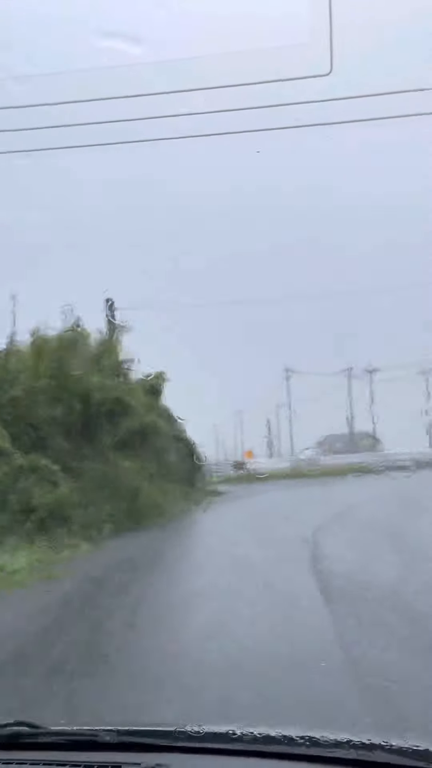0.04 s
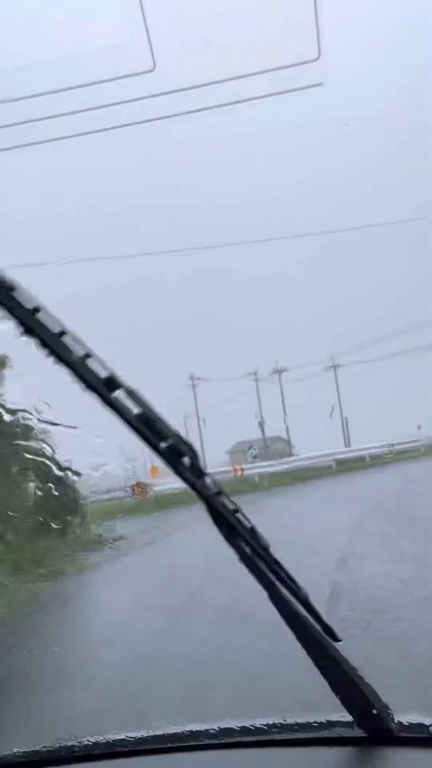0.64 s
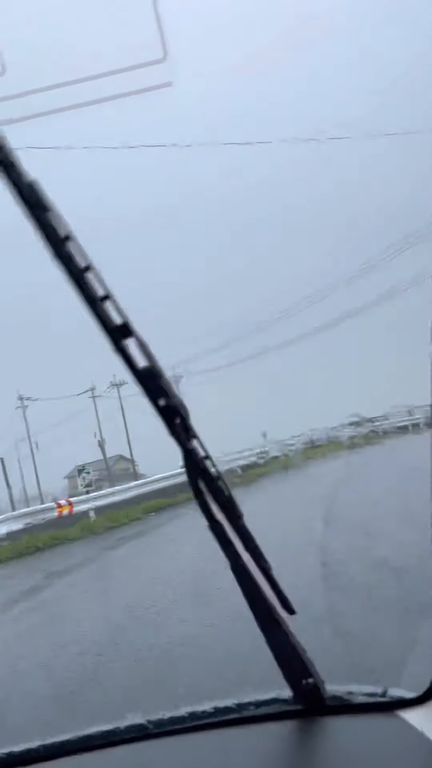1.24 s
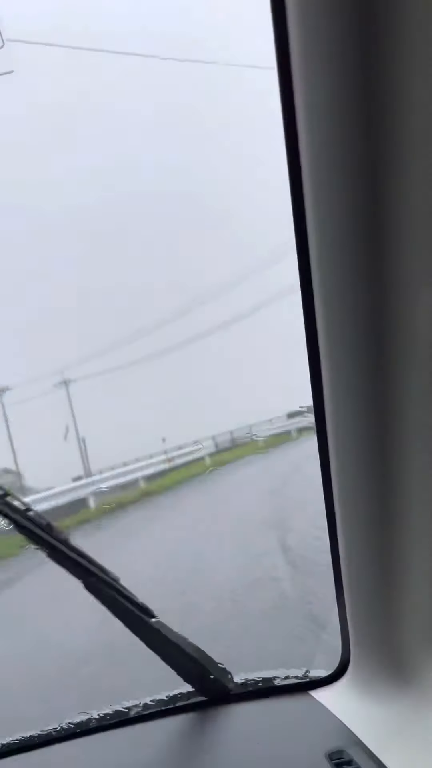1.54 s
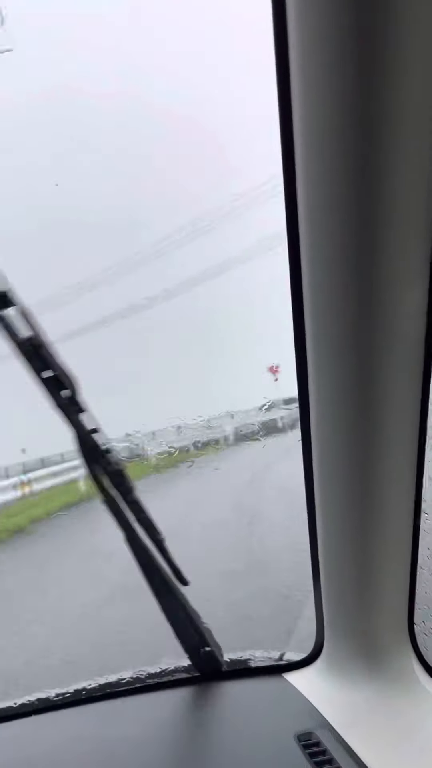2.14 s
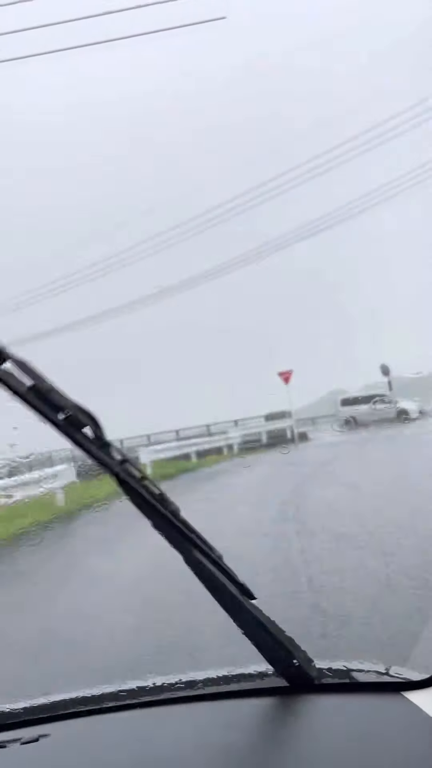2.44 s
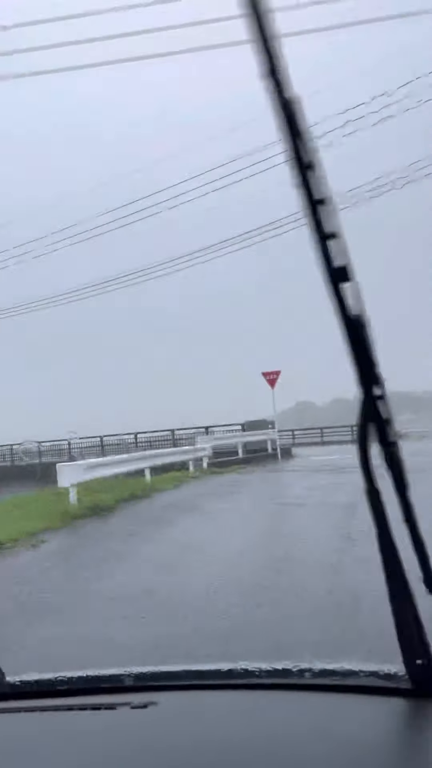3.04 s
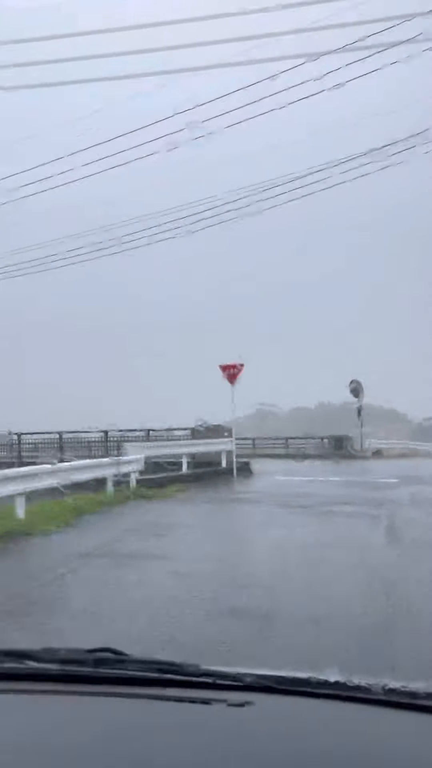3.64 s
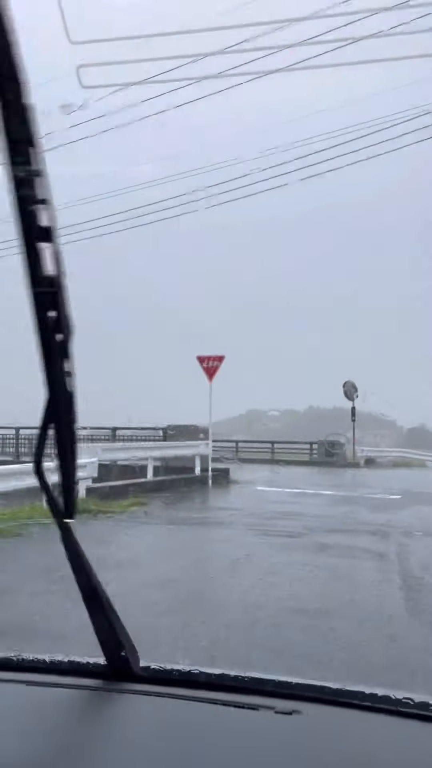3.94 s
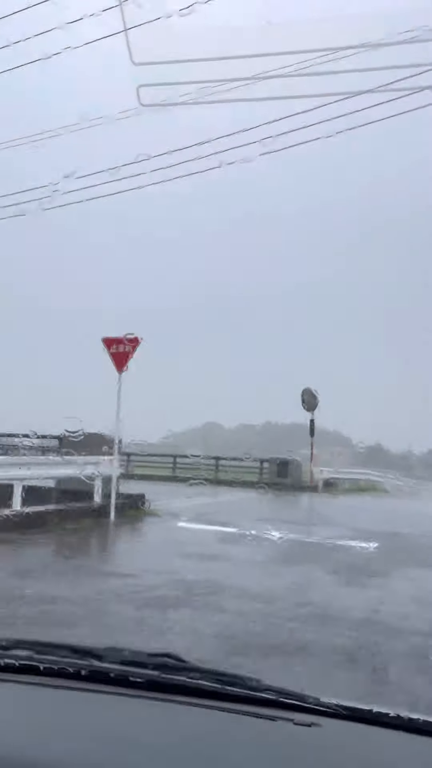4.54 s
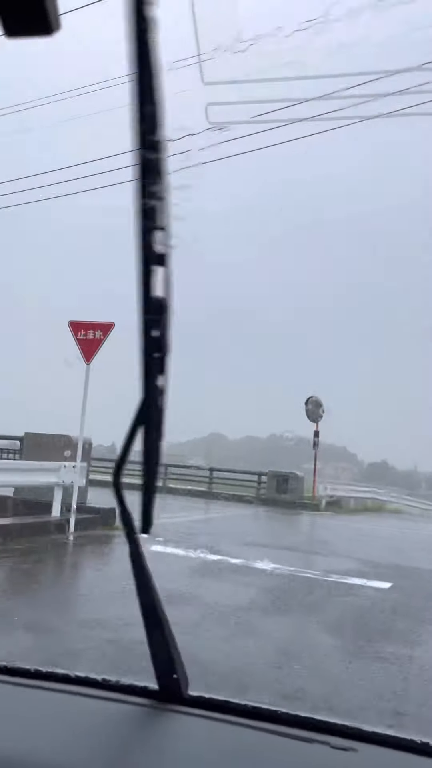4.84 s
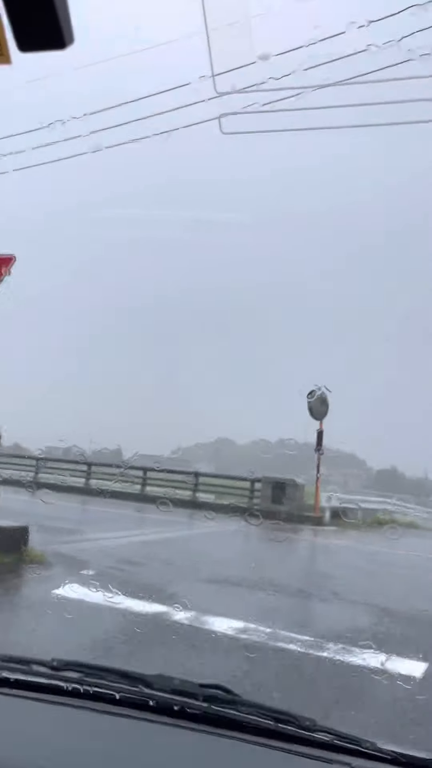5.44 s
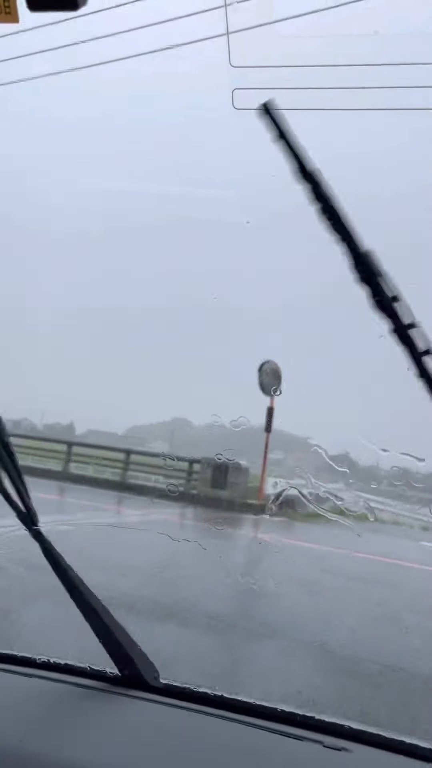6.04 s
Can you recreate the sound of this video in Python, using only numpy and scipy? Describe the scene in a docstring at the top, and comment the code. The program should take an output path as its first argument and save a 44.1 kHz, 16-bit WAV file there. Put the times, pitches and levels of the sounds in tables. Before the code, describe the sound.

Rain drums on a moving car, heard from inside over low road rumble, with steadily thumping wipers and fading tyre spray.

```python
"""Road rumble fills a car that slows for a junction in heavy rain, heard at two close microphone ports.
The tyres force the body into vibration, and the cabin air booms. Wiper impacts excite the modes of the
windshield at both ends of each sweep; between them the blades swish through the water. Drops drum on the
roof and ring on the glass, spray hisses less as the speed falls, and a few sharp ticks sound nearby."""
import sys
import numpy as np
from scipy import signal
from scipy.fft import rfft, irfft, next_fast_len
from scipy.io import wavfile
from scipy.ndimage import uniform_filter1d, map_coordinates

SR = 44100
rng = np.random.default_rng(int(sys.argv[2]) if len(sys.argv) > 2 else 0)


def unload_wav(signal):
    """Save mono or channel-first audio to the path in sys.argv[1] as 16-bit WAV at rate SR, clipped to [-1, 1]."""
    wavfile.write(
        sys.argv[1],
        SR,
        np.round(np.clip(np.atleast_2d(signal).T, -1, 1) * 32767).astype(np.int16),
    )


N = 276948
TIME = np.arange(N) / SR
BAND_LIMIT_HZ = 15800

# Spectra of the body rumble and the cabin boom: f/Hz, relative density/dB
RUMBLE_SPECTRUM = [(12, -52), (22, -19), (32, 4), (41, -13), (50, 5.5), (72, 3.5), (88, 3), (100, -1.5),
                   (116, -5), (135, -6.5), (250, -61)]
BOOM_SPECTRUM = [(95, -8), (128, 2), (163, 0), (181, -14.5), (198, -9), (222, -11), (290, -13), (350, -15),
                 (480, -24), (700, -51)]
# Rougher and smoother stretches of road: middle t/s, duration/s, level change/dB
ROAD_SURFACE = [(1.8, 1, 1.5), (5.344, 0.41, 2), (5.76, 0.26, -4.5)]


def road():
    """Structure-borne sound: tyres shake the body and cabin air; the boom dies away as the car slows."""
    surface_db = sum(db * np.exp(-(2 * (TIME - s) / length) ** 2) for s, length, db in ROAD_SURFACE)
    rumble = amp(-17.5 + 0.013 * slowing_db()) * drone(RUMBLE_SPECTRUM, evenness=.7, span_s=.14)
    boom = amp(-20.5 + 0.82 * slowing_db()) * drone(BOOM_SPECTRUM, evenness=.6, span_s=.2)
    return amp(surface_db) * (rumble + boom + hum())


# Low cabin tones: f/Hz, base level/dB, fall per dB of slowing/dB
CABIN_TONES = [(70.35, -26.5, 0.44), (100.7, -27, 0.2), (134.1, -27.5, 1.5), (163.5, -24.5, 1.4),
               (192.7, -33.5, 0.37)]


def hum():
    """Forced vibration: engine and road sustain low, wavering tones, alike at both ports."""
    track = np.zeros(N)
    for hz, db, follows in CABIN_TONES:
        level_db = db + follows * slowing_db() + wobble(6)
        pitch = hz * (1 + 0.0195 * wobble(7))
        track += amp(level_db) * np.sqrt(2) * tone(pitch)
    return track


SWEEP_S, FAR_TURN_S, FOOT_TURN_S = .8968, .481, .026  # wiper period; first turn at each end
# Modes of the windshield with its linkage, and of the rubber lip: f/Hz, relative level/dB, T60/s
GLASS_MODES = [(146, -8.5, 0.28), (202.8, -9.5, 0.4), (229.6, 4, 0.071), (295.6, -0.5, 0.11),
               (353, -3.5, 0.058), (402, -7.5, 0.068), (470, -16.5, 0.068), (530, -14.5, 0.095)]
LIP_MODES = [(850, 8.5, 0.094), (886, 10, 0.053), (986, 9, 0.053), (1764, 5, 0.03)]
# Friction of rubber on wet glass: f/Hz, relative density/dB
RUB_SPECTRUM = [(120, -10), (200, 5), (260, 2.5), (340, 4), (450, -6.5), (620, -12), (900, -17),
                (1100, -21), (2000, -35), (6000, -90)]
# Reversals at the far end of the sweep: t/s, thump gain/dB, lip gain/dB, drag level/dB
REVERSALS = [(0.4812, -11, -28, -34), (1.3785, -10.5, -29, -34), (2.2771, -10, -28.5, -20),
             (3.1706, -9.5, -34.5, -33), (4.0652, -9.5, -31, -27.5), (4.962, -11.5, -29, -28),
             (5.8621, -11, -30, -28.5)]


def wipers(foot_db=-13.5, cushion_s=.0033, lip_lead_s=.0078):
    """Impact and friction: at each reversal the lip snaps over, the arm knocks and the rubber rubs."""
    def knock():
        return blow(GLASS_MODES, scatter_db=.7, attack_s=cushion_s)

    def rub_off(s):
        return np.clip((TIME - s) / cushion_s, 0, 1) ** 2 * np.exp(-np.abs(TIME - s) / .078)

    knocks, rubbing = np.zeros((2, N))
    for s, thump_db, lip_db, drag_db in REVERSALS:
        add(knocks, s - lip_lead_s, amp(lip_db) * blow(LIP_MODES, scatter_db=1.5, attack_s=.004))
        add(knocks, s, amp(thump_db) * knock())
        # the second blade follows, more softly
        add(knocks, s + .0147, amp(thump_db - 3) * knock())
        add(knocks, s + .047, amp(lip_db - 11) * blow(LIP_MODES, scatter_db=2, attack_s=.003))
        drag = np.exp(-((TIME - s + .051) / .028) ** 2)  # swells just before the turn
        rubbing += amp(drag_db) * drag + amp(thump_db - 13) * rub_off(s)
    for s in np.arange(FOOT_TURN_S, N / SR, SWEEP_S):  # softer turns at the foot of the glass
        add(knocks, s - lip_lead_s, amp(foot_db - 35) * blow(LIP_MODES, scatter_db=6, attack_s=.0027))
        add(knocks, s, amp(foot_db) * knock())
        rubbing += amp(foot_db - 15.5) * rub_off(s)
    track = rubbing * unit(coloured(noise(), RUB_SPECTRUM))
    track[0] += knocks  # row 0 becomes the part that both ports share
    return track


def blow(modes, scatter_db, attack_s):
    """Modal superposition: a cushioned impact starts damped sinusoids, slightly different each time."""
    t = np.arange(SR // 3) / SR
    hz, db, t60 = np.transpose(modes)[:, :, None]
    strength = amp(db + scatter_db * rng.standard_normal(hz.shape))
    pitch = hz * (1 + 0.0094 * rng.standard_normal(hz.shape))
    ring = strength * amp(-60 * t / t60) * np.sin(2 * np.pi * pitch * t)
    return ring.sum(0) * (1 - np.exp(-2 * t / attack_s)) ** 2


# Water hiss, falling with the car's speed: t/s, relative level/dB
HISS_LEVELS = [(0.0, -32.5), (0.68, -33.5), (1.36, -35), (3.69, -38), (6.19, -48.5), (6.28, -49.5)]
# Fine spray: f/Hz, relative density/dB
HISS_SPECTRUM = [(200, -15), (420, 10), (600, 10), (730, 13), (1000, 3), (1800, 1), (3200, 3.5),
                 (4200, 3.5), (5200, 1.7), (7200, 0), (11100, 0.5), (11900, -5), (13000, -20.5),
                 (14200, -95)]


def spray(gain_db=3.5, flutter_db=0.85):
    """Incoherent summation: droplets on glass and tyres merge into a hiss, with a few standing out."""
    water = noise() + amp(-4.5) * drops(per_s=3000, spread_db=6.5)
    level_db = curve(HISS_LEVELS) + gain_db + flutter_db * wobble(24.38)
    return amp(level_db) * unit(coloured(water, HISS_SPECTRUM))


def slowing_db():
    """Hiss falls with speed, so its change since the start (negative) stands for the speed lost."""
    hiss_db = curve(HISS_LEVELS)
    return hiss_db - hiss_db[0]


# Rain heard through the lined roof: f/Hz, relative density/dB
ROOF_SPECTRUM = [(120, -7), (250, 3), (400, -1), (550, -2.3), (595, -2.5), (655, -1.5), (740, -3),
                 (820, -1), (960, -3.5), (1270, -4), (1380, -7.5), (1490, -9), (1580, -5.5), (1660, -9),
                 (1770, -9), (2170, -14.5), (2350, -12.5), (2560, -12), (2850, -18), (3030, -18.5),
                 (3300, -24.5), (9000, -84)]


def roof_rain():
    """Random impact excitation: dense drops drum on the roof panel, whose lining damps the treble."""
    patter = drops(per_s=2000, spread_db=2) + amp(1) * noise()
    patter = cabin_reflections(patter, wet_db=-12, t60=.08)
    level_db = -31.5 + 0.037 * slowing_db() + 1.3 * wobble(8.2)
    return amp(level_db) * unit(ports(coloured(patter, ROOF_SPECTRUM)))


def cabin_reflections(x, wet_db, t60):
    """Reverberation: glass and trim return a short, exponentially decaying tail of reflections."""
    t = np.arange(SR // 12) / SR
    tail = noise(len(t)) * amp(-60 * t / t60) * (t > .002)
    tail /= np.linalg.norm(tail[0])
    return x + amp(wet_db) * signal.fftconvolve(x, tail, axes=1)[:, :N]


CLUMP_DB, CLUMPS_PER_S = 1.4, 22  # water reaches the glass in uneven clumps
# Sound of the water on the windshield: t/s, level/dB
WETNESS = [(0, -41), (0.55, -37), (1.2, -39), (2.0, -44), (2.55, -37.5), (3.25, -39.5), (3.7, -43),
           (4.05, -37), (4.35, -42.5), (4.7, -42.5), (5.4, -43.5), (6.28, -48)]
# Water pushed by the blades: f/Hz, relative density/dB
SWISH_SPECTRUM = [(700, -25), (1150, 3), (2000, 0.5), (3000, 0), (4200, -4.5), (7000, -42), (13500, -85)]


def swish(stroke_db=0.5):
    """Flow noise: the blades push water, louder on wetter glass and slightly louder in mid-stroke."""
    water = noise() + drops(per_s=900, spread_db=4)
    level_db = curve(WETNESS) + stroke_db * (stroke() - 0.5) + CLUMP_DB * wobble(CLUMPS_PER_S)
    return amp(level_db) * unit(coloured(water, SWISH_SPECTRUM))


def stroke():
    """Harmonic motion: the blades' squared speed, 0 at the turns and 1 in mid-stroke."""
    return np.sin(2 * np.pi * (TIME - FAR_TURN_S) / SWEEP_S) ** 2


def splats(count=1500, median_hz=1766, log_spread=0.335, attack_s=.0002, t60=0.031):
    """Damped free vibration: each big drop on the windshield rings briefly at its own pitch."""
    track, t = np.zeros((2, N)), np.arange(SR // 30) / SR
    envelope = amp(-60 * t / t60) * (1 - np.exp(-t / attack_s)) ** 2
    for (when, place), (pitch, size) in zip(rng.random((count, 2)), rng.standard_normal((count, 2))):
        hz = median_hz * np.exp(log_spread * pitch)
        ring = amp(3 * min(size, 1.5)) * envelope * np.sin(2 * np.pi * hz * t)
        direction = np.array([[np.cos(np.pi * place)], [np.sin(np.pi * place)]])
        add(track, when * N / SR, direction * ring)
    level_db = -42.5 + 0.47 * slowing_db() + CLUMP_DB * wobble(CLUMPS_PER_S)
    return amp(level_db) * unit(track)


# Hard contacts: t/s, pulse gain/dB, fizz re pulse/dB, fizz T60/s, lower f/Hz, upper f/Hz
CONTACTS = [(4.5103, -3, -14, .004, 3600, 12500), (4.823, -10, -21, .035, 8600, 14000),
            (5.7243, -22, -11, .007, 6500, 13000), (5.7468, -5.5, -16, 0.0061, 3200, 12100),
            (5.925, -27, -6, .05, 10100, 11800)]
# Colouring common to all ticks: f/Hz, gain/dB
TICK_RESPONSE = [(1000, -10), (4000, -3), (6200, 0), (9000, -4), (11300, 3), (13500, -13), (16000, -18)]


def ticks():
    """Impulse excitation: each tiny hard contact gives a pulse and a short fizz in its own band."""
    track, t = np.zeros((2, N)), np.arange(SR // 20) / SR
    for s, db, fizz_db, t60, low_hz, high_hz in CONTACTS:
        snap = amp(fizz_db) * noise(len(t)) * amp(-60 * t / t60)
        snap[:, 0] = 1  # the pulse
        band = signal.butter(2, [low_hz, high_hz], 'bandpass', fs=SR, output='sos')
        add(track, s, amp(db) * signal.sosfilt(band, snap))
    return coloured(track, TICK_RESPONSE)


# Water striking the wheel arches: f/Hz, relative density/dB
ARCH_SPECTRUM = [(220, -28), (270, -1), (320, 4.5), (380, -10), (460, -10.5), (620, -12), (900, -26)]


def puddle(middle_s=0.39, length_s=0.88, level_db=-35):
    """Noise-driven resonance: standing water thrown up by the tyres drums in the wheel arches."""
    crossing = np.exp(-(2 * (TIME - middle_s) / length_s) ** 4)
    return amp(level_db) * crossing * unit(coloured(noise(), ARCH_SPECTRUM))


def wiper_motor(whine_hz=828, sag=0.022, whine_db=-50):
    """Gear-mesh tone: a faint, unsteady whine whose pitch sags under the load in mid-stroke."""
    pitch = whine_hz * (1 - sag * stroke() + 0.01115 * wobble(40))
    return amp(whine_db + 1.5 * wobble(13)) * tone(pitch)


# Relation between the microphone ports: f/Hz, left phase lead/rad, coherence (0-1)
PORT_COHERENCE = [(100, -0.0, 0.9993), (300, -0.3, 0.96), (550, -0.9, 0.66), (850, -1.5, 0.58),
                  (1200, -1.6, 0.38), (1500, -0.4, 0.75), (1900, 0.1, 0.88), (2900, 0.5, 0.28),
                  (3900, 0.8, 0.61), (4500, 2.0, 0.54), (4900, 3.2, 0.93), (5300, 5.3, 0.71),
                  (5800, 6.2, 1.0), (6300, 6.6, 0.97), (7400, 7.9, 0.8), (8400, 9.0, 0.98),
                  (9000, 9.42, 1.0), (9500, 9.75, 1.0), (9900, 10.3, 0.93), (10900, 11.0, 0.91),
                  (11900, 12.55, 1.0)]


def ports(pair):
    """Partial coherence: a shared and an opposed signal mix into left and right, shifted in phase."""
    f, lead, coherence = np.transpose(PORT_COHERENCE)

    def weights(hz):
        angle = np.arccos(np.clip(np.interp(hz, f, coherence), 0, 1)) / 2
        return np.array([np.cos(angle), np.sin(angle)])

    shared, opposed = filtered(pair, weights)
    left_right = np.array([shared + opposed, shared - opposed])
    return filtered(left_right, lambda hz: np.exp(.5j * np.outer([1, -1], np.interp(hz, f, lead))))


def drone(spectrum, evenness, span_s):
    """Compression: coloured noise of rms 1 whose swells longer than span_s are partly evened out."""
    x = unit(ports(coloured(noise(), spectrum)))
    power = np.abs(uniform_filter1d(np.mean(x ** 2, 0), int(span_s * SR))) + 1e-6
    return unit(x / power ** (evenness / 2))


def drops(per_s, spread_db):
    """Shot noise: two independent showers of impulses with log-normal sizes; rms 1."""
    sizes = amp(spread_db * noise()) * rng.choice([-1, 1], (2, N))
    return unit(sizes * (rng.random((2, N)) < per_s / SR))


def noise(length=N):
    """Two independent white noises."""
    return rng.standard_normal((2, length))


def tone(hz):
    """A sinusoid whose phase is the integral of its frequency."""
    return np.sin(2 * np.pi * np.cumsum(hz) / SR)


def wobble(knots_per_s):
    """A smooth curve through random knots."""
    knots = rng.standard_normal(int(N * knots_per_s / SR) + 4)
    return map_coordinates(knots, [TIME * knots_per_s])


def curve(rows):
    """Linear interpolation of (time, value) rows at every sample."""
    return np.interp(TIME, *np.transpose(rows))


def filtered(x, response):
    """Linear filtering: the spectrum of x times a complex frequency response."""
    size = next_fast_len(N + SR // 2)
    return irfft(rfft(x, size) * response(np.fft.rfftfreq(size, 1 / SR)), size)[..., :N]


def coloured(x, points):
    """Spectral shaping by (f/Hz, gain/dB) points, with a roll-off beyond the last."""
    f, db = np.transpose(points)

    def response(hz):
        return amp(np.interp(np.log(hz + 1), np.log(f), db)) / (1 + (hz / (2 * f[-1])) ** 4)

    return filtered(x, response)


def add(track, s, sound):
    """Superpose a sound on a track at time s."""
    start = max(0, round(s * SR))
    part = sound[..., :max(0, N - start)]
    track[..., start:start + part.shape[-1]] += part


def amp(db):
    """Decibels to amplitude ratio."""
    return 10 ** (np.asarray(db) / 20)


def unit(x):
    """Scale to rms 1."""
    return x / np.sqrt(np.mean(x ** 2) + 1e-20)


def scene():
    """Superposition at the front seat; the roof is a little louder on the right."""
    front = splats() + spray() + swish() + wipers() + puddle()
    return road() + roof_rain() * amp([[-.5], [.5]]) + ports(front) + wiper_motor() + ticks()


def record(dry, low_cut_hz=25):
    """Band limiting: the microphone sheds the deepest rumble and the highest treble."""
    return filtered(dry, lambda hz: 1 / (1 + (low_cut_hz / (hz + 1)) ** 6) / (1 + (hz / BAND_LIMIT_HZ) ** 80))


dry = scene()
out = record(dry)
unload_wav(out)
```